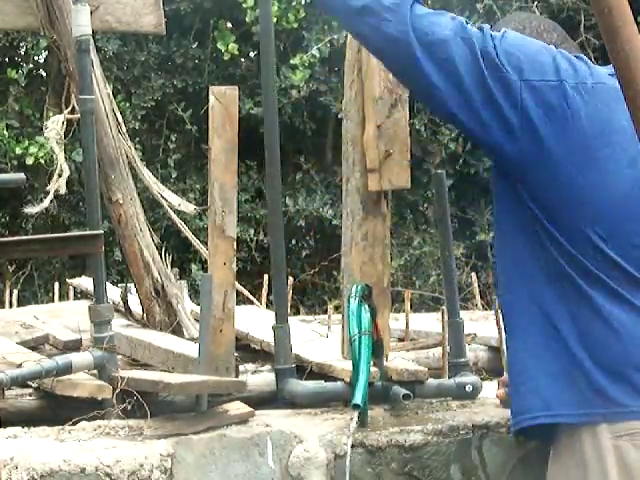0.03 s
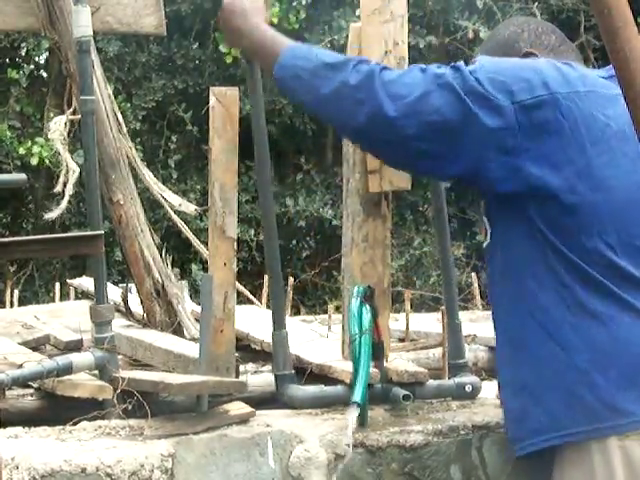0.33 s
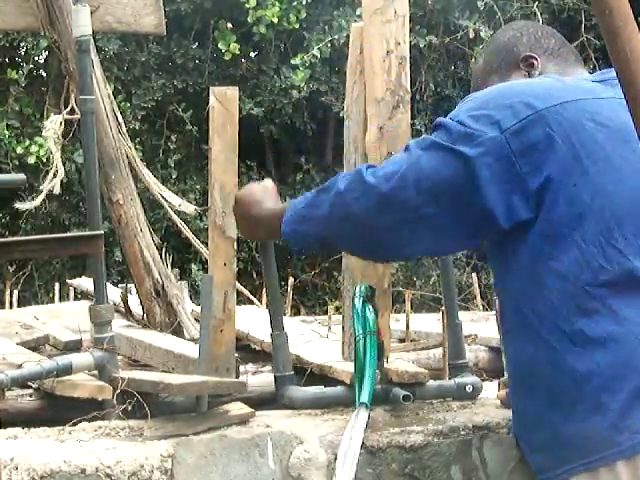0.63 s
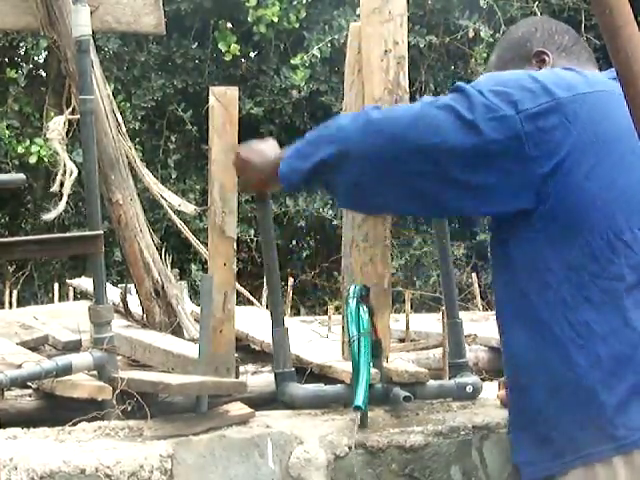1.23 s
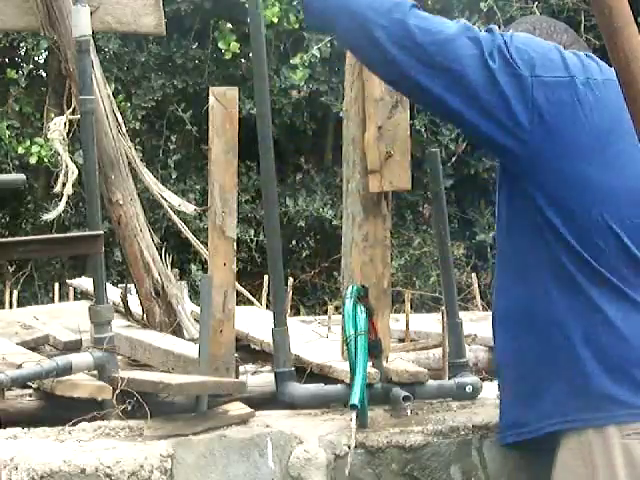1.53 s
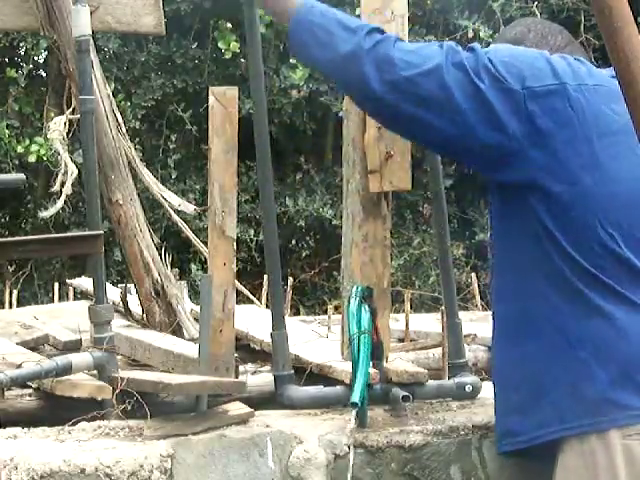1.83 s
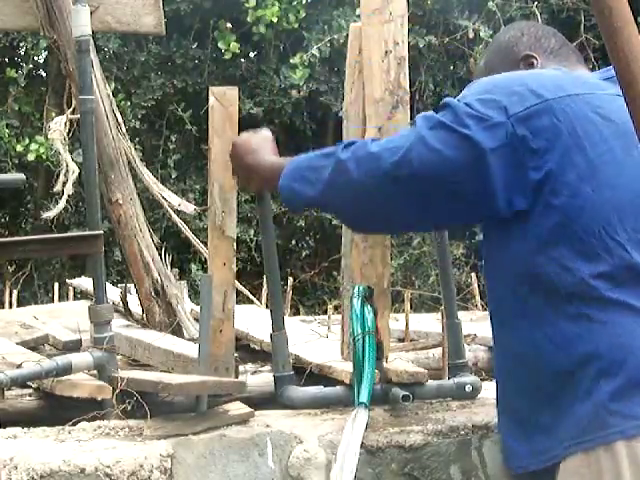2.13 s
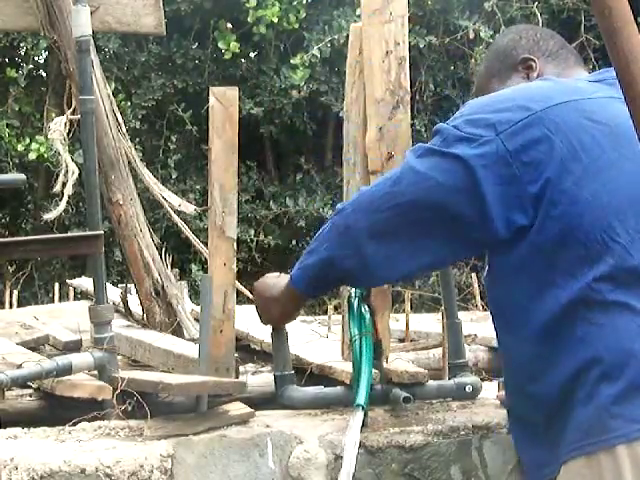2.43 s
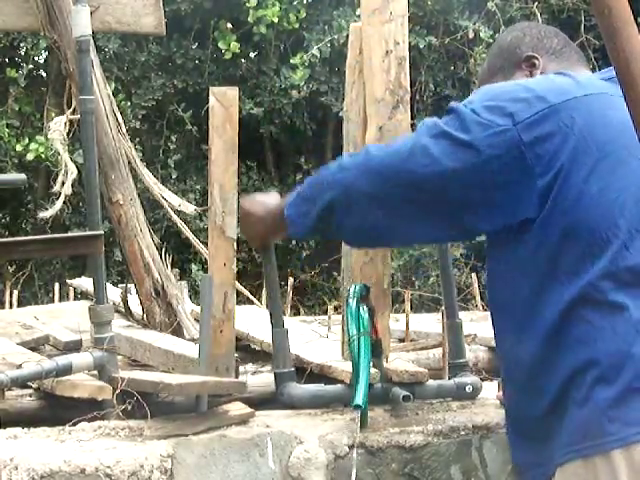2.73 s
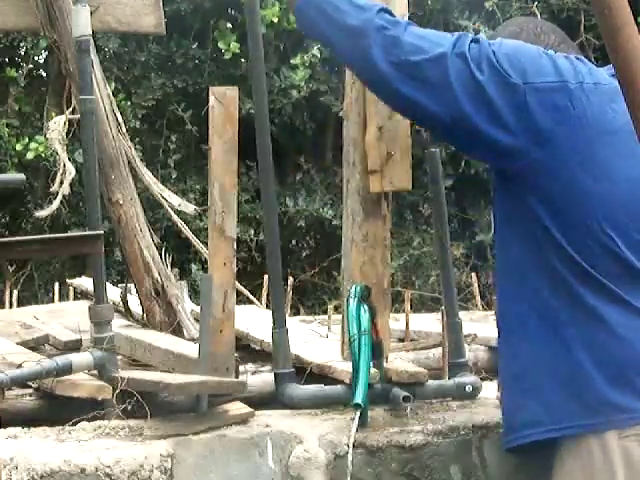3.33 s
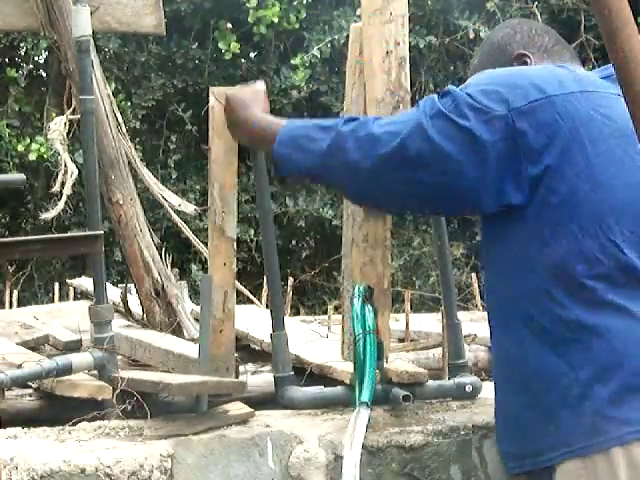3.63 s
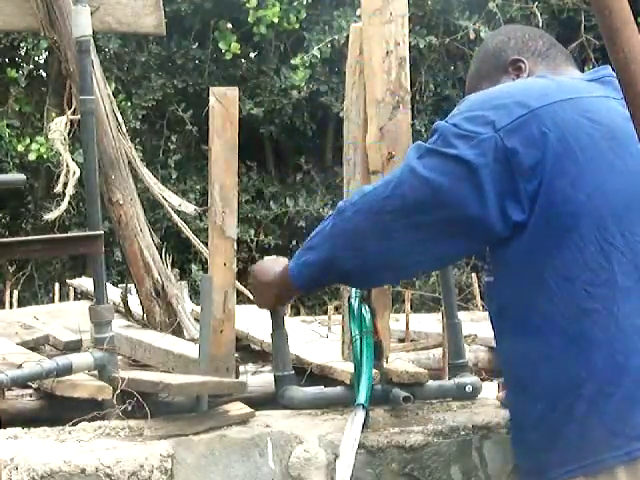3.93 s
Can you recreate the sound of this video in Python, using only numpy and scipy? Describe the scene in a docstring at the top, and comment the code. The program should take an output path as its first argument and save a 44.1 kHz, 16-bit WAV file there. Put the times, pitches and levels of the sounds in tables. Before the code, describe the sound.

Water gushes from a hand pump onto stone in surges, with dribbles and soft motor clicks.

```python
"""Water from a hand pump gushes out of a hose onto stone, outdoors, close on the right of the microphone.
Each stroke's gush thins to a dribble with single slapping drops; the pipe gurgles, rushes and squeaks.
Close on the left a small motor, probably a focusing lens, steps in even runs of dull knocks that ring
its housing. A breeze rumbles on the narrow-band stereo microphone."""
import sys
import numpy as np
from scipy import signal
from scipy.fft import rfft, irfft
from scipy.io import wavfile
from scipy.ndimage import uniform_filter1d

SR = 44100
rng = np.random.default_rng(int(sys.argv[2]) if len(sys.argv) > 2 else 0)


def int16_out(signal):
    """Quantize to a 16-bit WAV file."""
    q = np.round(np.clip(np.atleast_2d(signal).T, -1, 1) * 32767)
    wavfile.write(sys.argv[1], SR, q.astype(np.int16))


N = 176400

# full stream on the stone (time [s], level [dB])
STREAM_LEVEL = [(0, -33.5), (.63, -36), (.66, -25.5), (.71, -24), (.74, -18), (.87, -18.5), (.95, -18),
                (1.16, -17.5), (1.26, -25.5), (1.33, -28.5), (1.41, -42.5), (1.73, -27.5), (1.77, -22),
                (1.94, -22.5), (2.02, -28.5), (2.222, -33.5), (2.24, -17.5), (2.33, -17.5), (2.52, -18.5),
                (2.65, -14.5), (2.77, -20), (2.87, -21.5), (2.96, -33), (3.35, -48), (3.8, -43),
                (3.85, -24), (4, -19.5)]
# thin dribble on the stone (time [s], level [dB])
DRIBBLE_LEVEL = [(0, -31), (.42, -32.5), (.58, -55), (.7, -25.5), (1.36, -25.5), (1.45, -36), (1.63, -28),
                 (1.85, -32.5), (2.05, -32.5), (2.19, -37.5), (2.95, -38), (3.03, -29.5), (3.3, -44),
                 (3.5, -30.5), (4, -29.5)]
# gurgle in the pipe (time [s], level [dB])
GURGLE_LEVEL = [(0, -40), (.6, -42.5), (1.3, -45), (1.65, -39.5), (1.85, -34.5), (2.15, -38.5), (2.35, -41),
                (3.3, -42.5), (3.6, -43), (4, -45.5)]
# water rushing up the hose (time [s], level [dB])
RUSH_LEVEL = [(0, -34.5), (.6, -33.5), (1.4, -32.5), (2.95, -38.5), (3.04, -31.5), (3.2, -30),
              (3.27, -37.5), (3.38, -35), (3.46, -31.5), (3.62, -22.5), (3.74, -24), (3.8, -26.5),
              (4, -34.5)]
# breeze on the microphone (time [s], level [dB])
BREEZE_LEVEL = [(0, -25), (.3, -23), (.58, -32), (.68, -18.5), (.76, -31), (1.1, -22), (1.45, -27),
                (1.65, -29.5), (1.82, -22.5), (2.15, -38), (2.36, -25.5), (2.5, -32.5), (2.75, -25.5),
                (2.95, -39), (3.3, -35), (4, -48)]
# hollow resonance of the hose (time [s], level [dB])
HOLLOW_LEVEL = [(3.36, -73), (3.45, -35.5), (3.74, -40.5), (3.9, -67)]
# stray droplets (time [s], level [dB])
DROPLET_TICKS = [(.003, -17), (.066, -21.5), (.088, -18), (.119, -20), (.424, -23.5), (0.479, -21),
                 (1.463, -21.5), (3.299, -18.5)]
# runs of motor steps (time [s], length [s], first relative peak [dB], last relative peak [dB])
MOTOR_RUNS = [(.063, .03, -20, -19.5), (0.1428, .167, -16.5, -15), (0.325, .03, -24, -17),
              (0.999, .03, -18, -19.5), (1.075, .167, -14.5, -14), (1.257, .03, -21.5, -22),
              (2.532, .03, -16.5, -17), (2.6094, .167, -14.5, -15.5), (2.836, .03, -21.5, -21.5),
              (2.91, .233, -27, -22), (3.198, .03, -25.5, -27), (3.331, .03, -27.5, -28)]
# single big drops (time [s], level [dB])
DROP_SLAPS = [(0.187, -12.5), (.317, -8), (0.326, -13), (0.356, -18.5), (0.437, -18.5), (.531, -7),
              (0.654, -16), (.73, -6.5), (0.735, -9.5), (0.81, -6.5), (0.824, -16), (.863, -5.5),
              (.957, -14), (0.971, -7), (0.997, -7), (1.101, -6), (1.156, -11), (1.176, -9), (1.303, -7),
              (1.318, -10.5), (1.337, -16), (1.366, -14.5), (1.509, -14), (1.522, -16.5), (1.78, -11.5),
              (1.864, -12.5), (1.918, -14.5), (1.947, -14), (2.087, -10.5), (2.095, -16), (2.12, -13.5),
              (2.135, -11), (2.229, -5.5), (2.244, -8), (2.367, -15.5), (2.416, -5), (2.44, -8.5),
              (2.78, -13.5), (2.863, -10.5), (2.887, -6), (2.904, -2.5), (2.922, -6.5), (2.966, -19.5),
              (3.01, -16), (3.234, -20.5)]
# thumps as the water starts to flow (time [s], length [s], pitch [Hz], level [dB])
FLOW_THUMPS = [(0.639, 0.065, 67.7, -19), (1.759, 0.35, 87.4, -27), (2.302, 0.1, 85, -27)]
# slugs of water bursting on the stone (time [s], decay time [s], level [dB])
SLUG_SPLATS = [(0.666, 0.02, -9), (1.287, 0.019, -16.5), (2.226, 0.06, -13), (2.779, 0.011, -5.5),
               (2.819, 0.0076, -15), (3.328, 0.014, -19), (3.822, 0.025, -13.5)]
# falling squeaks (time [s], length [s], start pitch [Hz], target pitch [Hz], level [dB])
PIPE_SQUEAKS = [(1.652, 0.031, 5070, 2750, -22), (1.663, .033, 5100, 2770, -25),
                (1.78, .11, 4390, 3770, -26.5), (2.822, 0.018, 3150, 3090, -25)]
# modes of the motor's housing (frequency [Hz], relative level [dB], t60 [s])
MOTOR_MODES = [(275, -8, 0.024), (471.5, -6, 0.021), (720, -14.5, 0.039), (1097, -6, 0.03),
               (1232, 4, 0.012), (1513, 0.5, 0.014), (2105, -3, 0.013), (2467, -3.5, 0.013),
               (3130, -14, 0.018)]
# scrape and diffuse ring of the housing (frequency [Hz], relative level [dB])
HOUSING_SPECTRUM = [(120, -15), (240, 7.5), (370, 8.5), (600, -11.5), (860, 9.5), (1120, 5), (1550, 0.5),
                    (1850, -17), (2400, 0), (3200, -24), (4200, -37.5), (8000, -52)]
# each source's spectral shape at the microphone (frequency [Hz], left [dB], right [dB])
STREAM_SPECTRUM = [(100, -42, -30), (392, -33, -27), (714, -23, -24), (910, -29.5, -24), (1460, -27, -14),
                   (1990, -30.5, -16), (2990, -32, -12.5), (3830, -31, -7), (4725, -29.5, 1),
                   (5640, -29.5, -13), (5700, -30, -13.5), (7430, -27.5, -24.5), (12000, -45.5, -54)]
DROP_SPECTRUM = [(200, -31.5, -34.5), (875, -28, -28.5), (1490, -39, -32), (2480, -42, -25),
                 (3615, -38.5, -10.5), (4340, -30, 3.5), (4770, -34.5, 7), (5370, -34, -10.5),
                 (6170, -34.5, -24), (6600, -36, -23), (10800, -26, -53)]
GURGLE_SPECTRUM = [(80, -11.5, -10.5), (199, -8, -9), (382, -9.5, -6.5), (460, -14.5, -16),
                   (542.5, 0.5, -5.5), (730, -11, -6.5), (754, 3.5, -9.5), (751, -8, -13), (1344, -17, -8),
                   (2480, -22.5, -31.5), (8000, -47.5, -45)]
RUSH_SPECTRUM = [(300, -27, -38.5), (960, -53, -23.5), (1330, -21, -12.5), (1750, -25.5, -7.5),
                 (2200, -30.5, -21), (3080, -41.5, -19), (3330, -28, -8.5), (4320, -33, -10.5),
                 (4596, -22.5, 2), (5310, -27, -12), (6100, -28, -18.5), (7060, -26, -24.5),
                 (12000, -47.5, -69)]
BREEZE_SPECTRUM = [(10.2, -27.5, -3.5), (32, -12.5, 4), (64, -18, -4.5), (97, -19, -9.5), (158, -27, -21),
                   (254, -27.5, -26), (606, -30, -50), (3000, -87.5, -93)]
TICK_SPECTRUM = [(1000, -42, -45), (3900, -20, 0.5), (5460, -23, 7), (7000, -16.5, -12.5),
                 (12000, -34, -33)]
SPLAT_SPECTRUM = [(150, -32, -19.5), (600, -31.5, -26), (950, -34, -26.5), (1500, -29, -19.5),
                  (2100, -24, 1.5), (3100, -25.5, -7.5), (3830, -18.5, 3), (4400, -32, 11.5),
                  (5430, -35.5, -4), (7500, -23.5, -24.5), (12000, -33.5, -41.5)]

MIC_TOP_HZ, HOSE_LEFT_DB = 7800, -8.5


def undb(db):
    """Decibels to gain."""
    return 10 ** (np.asarray(db) / 20)


def unit(x):
    """Scale to rms 1."""
    return x / np.sqrt(np.mean(x ** 2) + 1e-18)


def curve(rows):
    """Gain over time from rows of (time [s], level [dB])."""
    return undb(np.interp(np.arange(N) / SR, *np.array(rows).T))


def wander(per_s):
    """Smooth random wander with rms 1."""
    hold = max(int(SR / per_s), 1)
    steps = np.repeat(rng.standard_normal(N // hold + 1), hold)
    return unit(uniform_filter1d(steps, hold)[:N])


def add(out, start, x):
    """Mix x into out from a start time in seconds."""
    i = max(int(start * SR), 0)
    out[i:i + len(x)] += x[:max(N - i, 0)]


def on_right(x, left_db):
    """Place a sound on the right by turning the left channel down."""
    return x * np.array([[undb(left_db)], [1]])


def band(low_hz, high_hz):
    """Noise between two frequencies, unrelated left and right."""
    sos = signal.butter(2, [low_hz, high_hz], "bandpass", fs=SR, output="sos")
    return unit(signal.sosfilt(sos, rng.standard_normal((2, N))))


def colour(x, spectrum, size=2048):
    """Filter x once for each dB column; the strongest filter has unit power."""
    hz, *columns = np.array(spectrum, float).T
    bin_hz = np.maximum(np.arange(size // 2 + 1) * SR / size, 1)
    gains = undb([np.interp(np.log(bin_hz), np.log(hz), db) for db in columns])
    cepstrum = irfft(np.log(gains))
    cepstrum[:, 1:size // 2] *= 2  # folding the cepstrum makes the filters causal
    cepstrum[:, size // 2 + 1:] = 0
    response = irfft(np.exp(rfft(cepstrum)))
    response /= np.sqrt((response ** 2).sum(axis=1).max())
    return signal.fftconvolve(np.atleast_2d(x), response, axes=1)[:, :x.shape[-1]]


def bursts(envelope, spectrum):
    """Coloured spray, evened out so that it follows a short envelope."""
    spray = colour(rng.standard_normal((2, N)), spectrum)
    power = np.abs(signal.hilbert(spray[1])) ** 2
    return envelope * spray / np.sqrt(uniform_filter1d(power, size=70) / 2 + 1e-9)


def patter(per_s, spread_db, hiss_db, flutter_db):
    """Random droplet impacts of unequal size over diffuse spray, fluttering as the jet breaks up."""
    spray = undb(hiss_db) * rng.standard_normal((2, N))
    hits = rng.random(N) < per_s / SR
    size = np.minimum(rng.exponential(size=N), 2.5)
    impacts = unit(hits * undb(spread_db * size) * rng.choice([-1, 1], N))
    return unit((impacts + spray) * undb(flutter_db * wander(70)))


def bubbles(centre_hz, octaves, count):
    """Bubbles at random times, each ringing briefly and rising in pitch."""
    decay_cycles, pitch_rise, spread_db = 8.4, 0.0265, 18.5
    t = np.arange(SR // 16) / SR
    out = np.zeros(N)
    for when, pitch, strength in rng.random((count, 3)):
        hz = centre_hz * 2 ** (octaves * (pitch - .5))
        age = hz * t / decay_cycles
        glide = 1 + pitch_rise * np.tanh(age / 2)
        ring = np.exp(-age) * np.sin(2 * np.pi * hz * t * glide)
        add(out, when * N / SR, undb(spread_db * strength) * ring)
    return unit(out)


def stream():
    """Each stroke's gush lands on wet stone, close on the right, with small bubbles."""
    splash = patter(per_s=1000, spread_db=3.5, hiss_db=-1, flutter_db=1.62)
    fizz = undb(-13.5) * bubbles(centre_hz=2926, octaves=2.4, count=900)
    return colour((splash + fizz) * curve(STREAM_LEVEL), STREAM_SPECTRUM)


def dribble():
    """A thin, patchy trickle lands on the same stone, with fewer and higher bubbles."""
    splash = patter(per_s=420, spread_db=4.5, hiss_db=0, flutter_db=2.4)
    fizz = undb(-12.5) * bubbles(centre_hz=4400, octaves=1, count=220)
    patches = undb(1.6 * wander(40))
    return colour((splash + fizz) * patches, DROP_SPECTRUM) * curve(DRIBBLE_LEVEL)


def gurgle():
    """Bubbles and churning water sound in the pipe."""
    centre = undb(-14.5) * bubbles(centre_hz=654.4, octaves=2.01, count=500) + rng.standard_normal(N)
    wide = undb(-1) * rng.standard_normal((2, N))
    churn = colour(centre + wide, GURGLE_SPECTRUM)
    return churn / np.std(churn[0]) * curve(GURGLE_LEVEL)


def rush():
    """Water rushes up the hose on the right, hissing more as it speeds up."""
    flow = curve(RUSH_LEVEL)
    turbulence = rng.standard_normal((2, N)) * undb(2 * wander(33))
    hiss = undb(-44) * band(6200, MIC_TOP_HZ) * (flow / flow.max()) ** 2
    return colour(turbulence, RUSH_SPECTRUM) * flow + on_right(hiss, HOSE_LEFT_DB)


def breeze():
    """Eddies rumble on each side of the microphone separately."""
    eddies = [colour(rng.standard_normal(N), BREEZE_SPECTRUM, size=8192)[side] for side in range(2)]
    gusts = undb(2.3 * wander(14))
    return np.array(eddies) * curve(BREEZE_LEVEL) * gusts


def ticks(decay_s=.003):
    """Stray droplets tick brightly on the stone."""
    t = np.arange(SR // 8) / SR
    envelope = np.zeros(N)
    for start, db in DROPLET_TICKS:
        add(envelope, start, undb(db) * np.exp(-t / decay_s))
    return bursts(envelope, TICK_SPECTRUM)


def knock(t, ring, softer_db):
    """One motor step knocks the housing's damped modes; gentler steps are duller and build more slowly."""
    dull_db_per_khz, rise_s, scrape_s = 0.36 * softer_db, .0011 * (2 + 0.3 * softer_db), .0065
    hz, db, t60 = np.array(MOTOR_MODES).T[:, :, None]
    detune, weight = rng.standard_normal((2, len(hz), 1))
    gains = undb(db - dull_db_per_khz * (hz / 1000 - 1) + 1.04 * weight)
    modes = gains * undb(-60 * t / t60) * np.sin(2 * np.pi * hz * (1 + 0.0093 * detune) * t)
    friction = colour(rng.standard_normal(len(t)), HOUSING_SPECTRUM)[0]
    scrape = undb(-15) * np.exp(-t / scrape_s) * friction
    rise = 1 - np.exp(-(t / rise_s) ** 2)
    body = rise * modes.sum(axis=0)
    return body / np.abs(body).max() + rise * (scrape + ring)


def motor():
    """A small motor steps evenly, close on the left; the right channel hears it later and weaker."""
    steps_per_s, full_knock_db, ring_t60_s = 29.97, -17.5, 0.076
    left_db, right_db, right_lag_s = 5.5, -4, .00008
    t = np.arange(SR // 8) / SR
    housing = colour(rng.standard_normal(len(t)), HOUSING_SPECTRUM)[0]
    ring = undb(-14 - 60 * t / ring_t60_s) * housing  # the same diffuse ring at every step
    out = np.zeros((2, N))
    for start, length, first_db, last_db in MOTOR_RUNS:
        count = max(round(length * steps_per_s), 1)
        for k, peak_db in enumerate(np.linspace(first_db, last_db, count)):
            step = knock(t, ring, softer_db=max(full_knock_db - peak_db, 0))
            when = start + k / steps_per_s
            add(out[0], when, undb(peak_db + left_db) * step)
            add(out[1], when + right_lag_s, undb(peak_db + right_db) * step)
    return out


def drops(slap_s=.002, scatter_s=.0057):
    """Big drops slap the stone for a few milliseconds and scatter."""
    t = np.arange(SR // 8) / SR
    slap = t / slap_s * np.exp(1 - (t / slap_s) ** 2) / np.sqrt(np.e / 2)
    scatter = undb(-7.5) * np.exp(-t / scatter_s)
    envelope = np.zeros(N)
    for start, db in DROP_SLAPS:
        add(envelope, start, undb(db) * (slap + scatter))
    return bursts(envelope, DROP_SPECTRUM)


def thumps(wobble=.2):
    """Starting water thumps softly on the right: a low, wobbling throb with a little rumble above it."""
    out = np.zeros(N)
    for start, length, hz, db in FLOW_THUMPS:
        swell = np.sin(np.linspace(0, np.pi, int(length * SR)))
        throb = np.sin(2 * np.pi * np.cumsum(hz * (1 + wobble * wander(90))) / SR)
        rumble = undb(-7.5) * band(hz, high_hz=184)[0]
        add(out, start, undb(db) * swell * (throb + rumble)[:len(swell)])
    return on_right(out, left_db=-22)


def splats(rise_s=.0019):
    """Slugs of water burst on the stone, lasting longer than the drops."""
    t = np.arange(SR // 8) / SR
    envelope = np.zeros(N)
    for start, decay_s, db in SLUG_SPLATS:
        add(envelope, start, undb(db) * (1 - np.exp(-t / rise_s)) * np.exp(-(t / decay_s) ** 2))
    return bursts(envelope * undb(0.52 * wander(300)), SPLAT_SPECTRUM)


def squeaks(settle_s=.022, flutter_db=2.5):
    """The pipe squeaks on the right: thin, broken tones that drop quickly towards a pitch."""
    out = np.zeros(N)
    for start, length, from_hz, to_hz, db in PIPE_SQUEAKS:
        t = np.arange(int(length * SR)) / SR
        glide_hz = to_hz + (from_hz - to_hz) * np.exp(-t / settle_s)
        hz = glide_hz * (1 + 0.015 * wander(700)[:len(t)])
        swell = np.sqrt(2 * np.sin(np.pi * t / length))
        flutter = undb(flutter_db * wander(150)[:len(t)])
        add(out, start, undb(db) * swell * flutter * np.sin(2 * np.pi * np.cumsum(hz) / SR))
    return on_right(out, left_db=-19)


def hollow_hose():
    """The emptied hose resonates in a narrow, hollow band."""
    return on_right(band(low_hz=1460, high_hz=1880) * curve(HOLLOW_LEVEL), HOSE_LEFT_DB)


def scene():
    """Pump and water close on the right, motor close on the left, breeze on the microphone."""
    bed = stream() + dribble() + gurgle() + rush() + breeze()
    return bed + ticks() + motor() + drops() + thumps() + splats() + squeaks() + hollow_hose()


def record(dry):
    """A narrow-band microphone; the loudest slaps clip, and a second low-pass follows."""
    mic_lowpass = signal.ellip(8, .3, 70, MIC_TOP_HZ, fs=SR, output="sos")
    output_lowpass = signal.ellip(8, .1, 70, 16000, fs=SR, output="sos")
    clipped = np.clip(signal.sosfilt(mic_lowpass, dry), -1, 1)
    return signal.sosfilt(output_lowpass, clipped)


dry = scene()
out = record(dry)
int16_out(out)
```